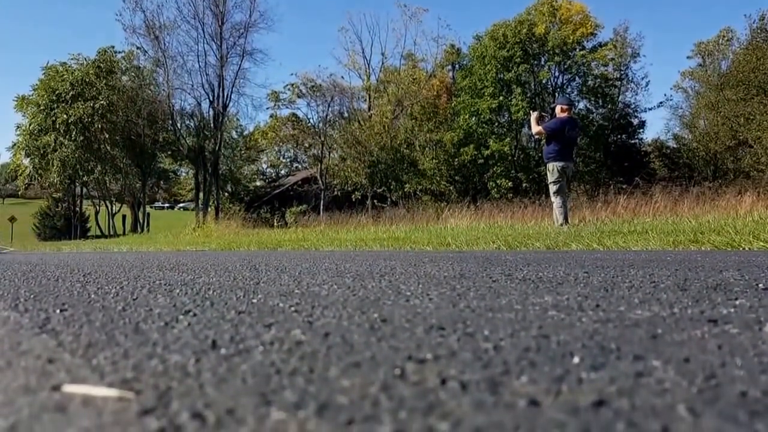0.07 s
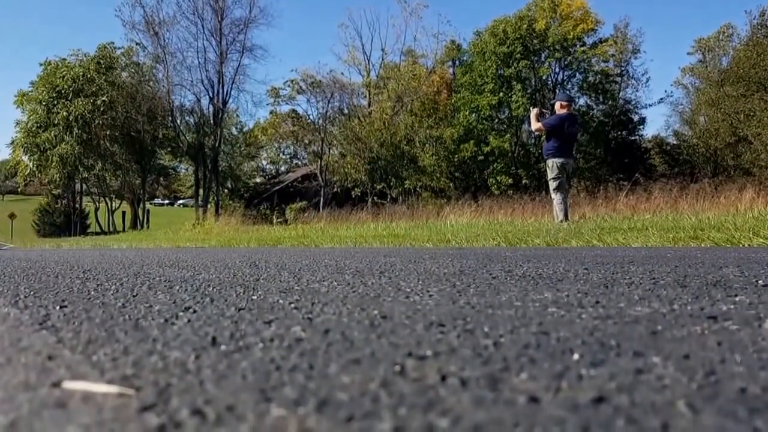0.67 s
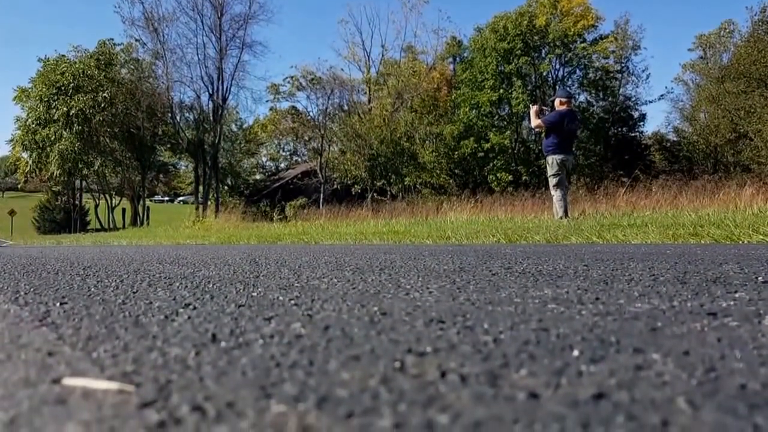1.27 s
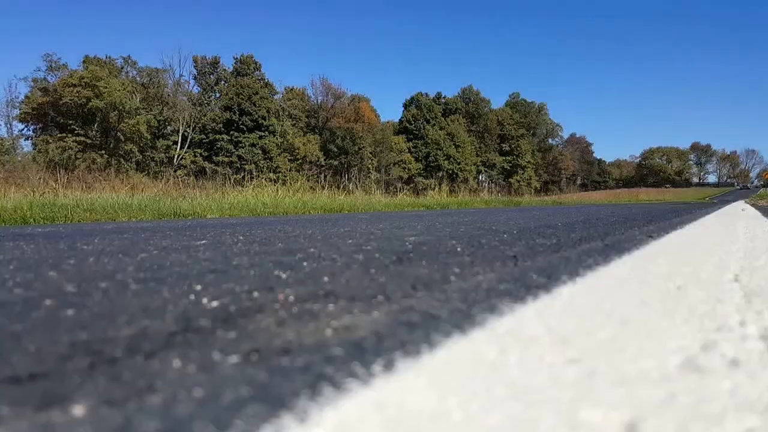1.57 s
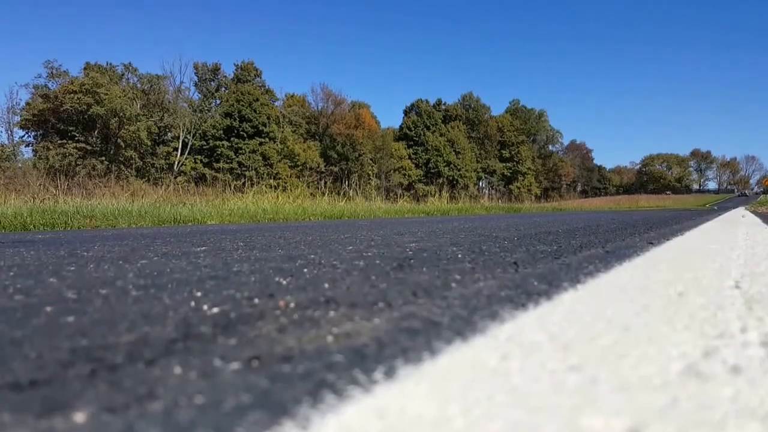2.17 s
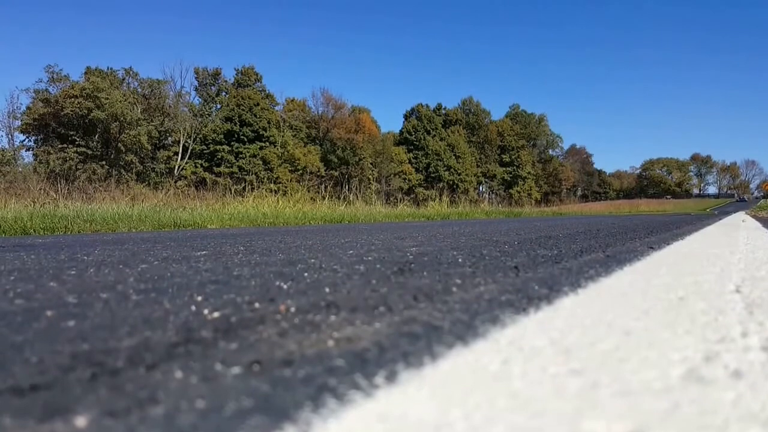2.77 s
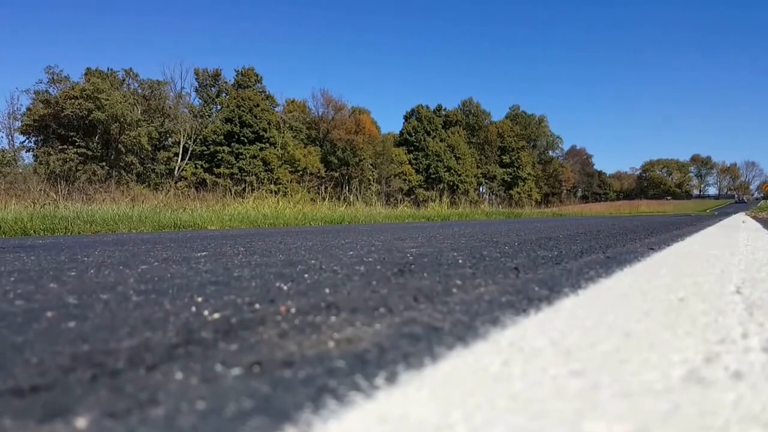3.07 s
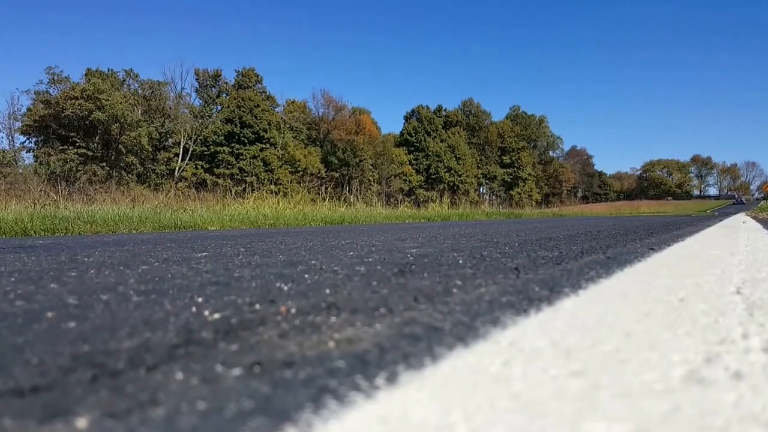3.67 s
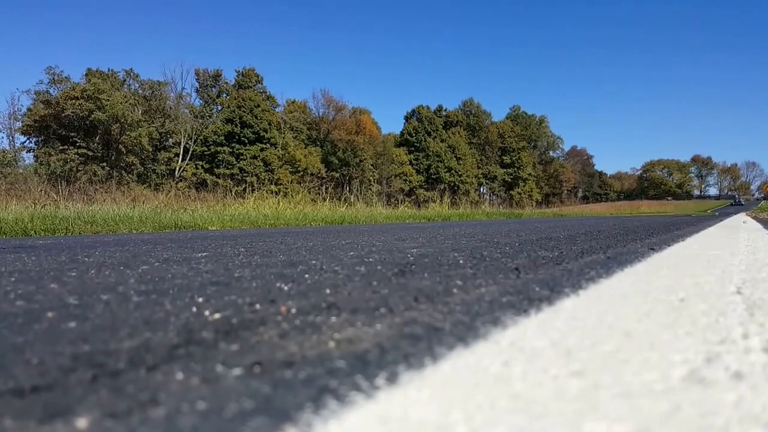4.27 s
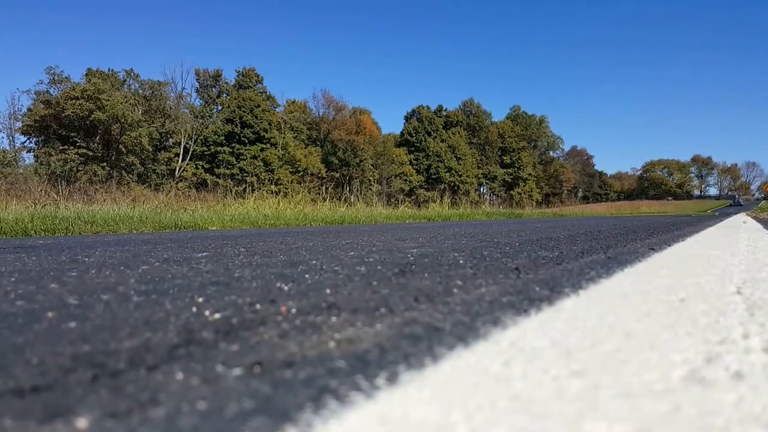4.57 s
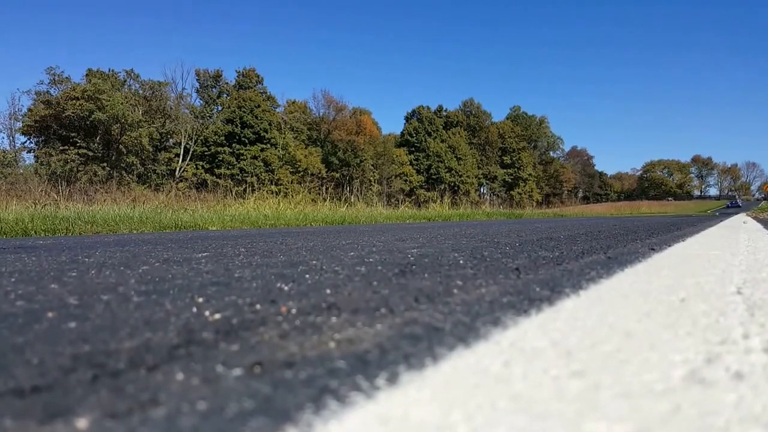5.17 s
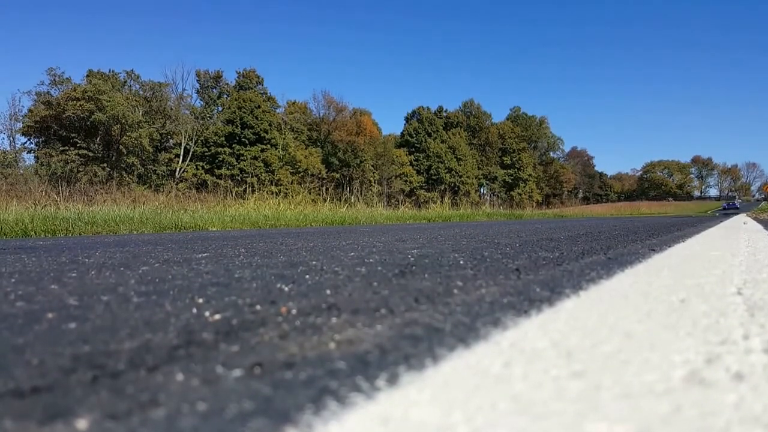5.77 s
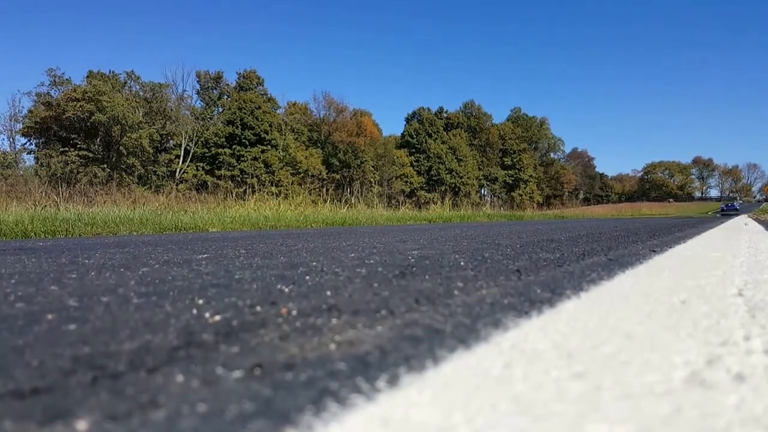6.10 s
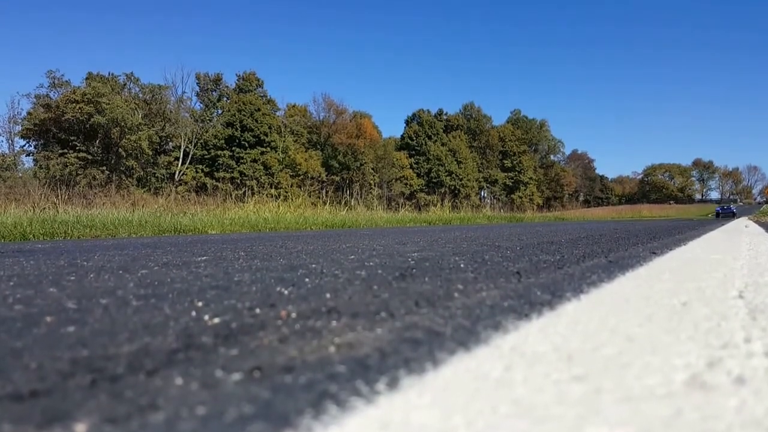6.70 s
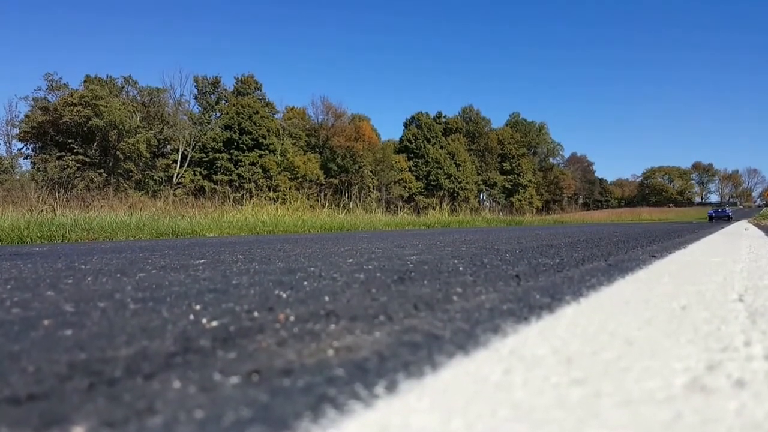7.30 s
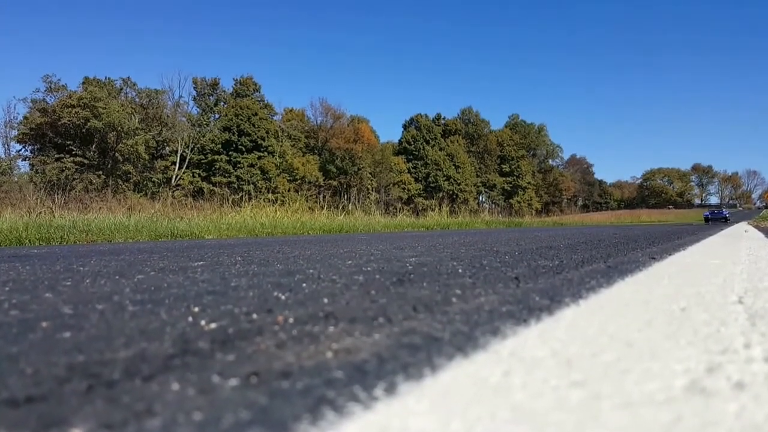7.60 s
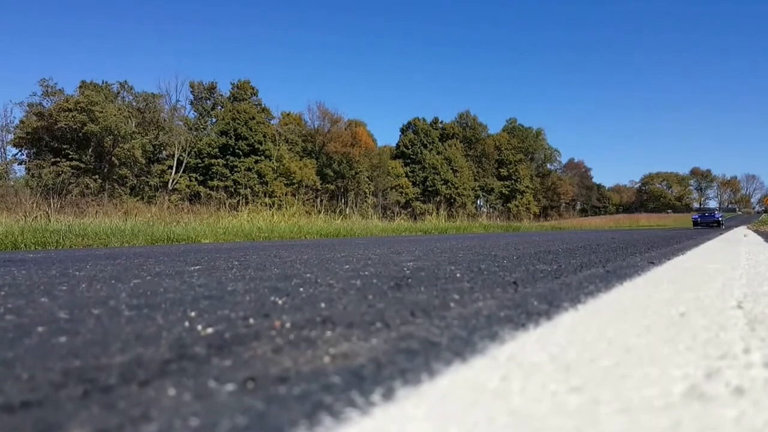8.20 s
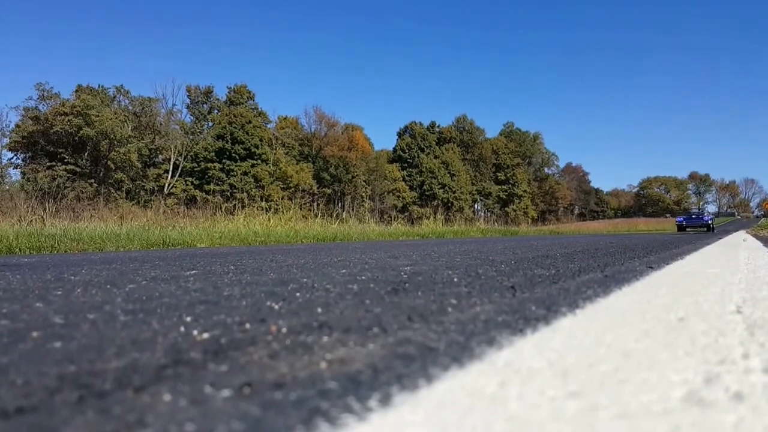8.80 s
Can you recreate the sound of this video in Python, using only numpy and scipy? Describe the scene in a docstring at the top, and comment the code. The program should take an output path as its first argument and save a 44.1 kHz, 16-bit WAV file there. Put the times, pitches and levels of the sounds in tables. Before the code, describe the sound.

A V8 car roars past close on the left with hissing exhaust, lifts off the throttle and is cut off abruptly. After a short silence the car is far away and much quieter, pulling, then easing to a low lumpy burble while its tyre hiss slowly grows. Something briefly brushes and ticks near the microphone on the right. A faint breeze and very faint insects lie behind it, beside a country road.

```python
"""V8 car on a country road, heard from the asphalt in two scenes. First it roars past close on the left
and lifts off the throttle. After a short silence it is far off, pulling, then easing to a burble as it
rolls nearer on hissing tyres. Exhaust: engine-cycle harmonics plus noise pulsed by the firings.
Something brushes and ticks near the microphone; a breeze stirs and insects chirp in the verge."""
import sys
import numpy as np
from scipy import signal
from scipy.fft import rfft, irfft, next_fast_len
from scipy.io import wavfile
from scipy.ndimage import map_coordinates

SR = 44100
rng = np.random.default_rng(int(sys.argv[2]) if len(sys.argv) > 2 else 0)


def int16_out(signal):
    """Quantize to a 16-bit WAV file."""
    q = np.round(np.clip(np.atleast_2d(signal).T, -1, 1) * 32767)
    wavfile.write(sys.argv[1], SR, q.astype(np.int16))


N = 390285
T = np.arange(N) / SR
TOP_HZ = 15750

# four-stroke cycle rate: t/s, f/Hz
NEAR_CYCLE_HZ = [(0, 31.06), (.2, 31.16), (.6, 32.16), (.76, 30.96), (1.02, 30.07), (1.25, 27.19),
                 (1.4, 26.31)]
FAR_CYCLE_HZ = [(1.8, 18.34), (2.4, 18.71), (3.36, 20.34), (3.55, 16.79), (4.1, 16.63), (4.45, 15.46),
                (5.55, 15.06), (5.98, 13.71), (6.7, 13.4), (7.1, 13.46), (8.85, 13.07)]
# close exhaust: cycle order (rounded in use), level/dB on throttle, level/dB lifted
NEAR_ORDERS_DB = [(2, -29, -29.5), (3, -14.5, -19), (4, -11, -21.5), (5, -18, -8.5), (6.01, -7.5, -1),
                  (7, -19, -15.5), (8, 0, -14.5), (9, -14.5, -12.5), (10, -12.5, -24), (11, -12.5, -18),
                  (11.87, -8.5, -19.5), (13, -17, -20.5), (14.1, -10, -34), (15, -4.5, -9),
                  (16, -10.5, -29.5), (17.2, -11.5, -20.5), (18, -18, -25.5), (19, -23.5, -31),
                  (20, -34.5, -43), (21, -24.5, -21), (22, -31, -38.5), (23, -16.5, -31), (24, -22, -38.5),
                  (25, -28.5, -31.5), (26, -30, -26.5), (27, -24.5, -33.5), (28, -45.5, -24),
                  (29, -24, -24.5), (30, -56, -35)]
# distant exhaust: cycle order, then level/dB pulling, easing, cruising, idling
FAR_ORDERS_DB = [(3, -27.5, -19, -21.5, -30), (4, -25, -24.5, -30, -21), (5, -8.5, -2, -11.5, -12),
                 (6, -21, -32, -9.5, -6.5), (7, -15, -20.5, -17, -16.5), (8, 1.5, -2, -9.5, -15),
                 (9, -38.5, -11, -30, -34), (10, -5.5, 0.5, 0, -25), (11, -17.5, -2, 0, -4.5),
                 (12, -24.5, -4, -10.5, -1.5), (13, -18, -7.5, 5, -6.5), (14, -22.5, -12.5, -2.5, 1.5),
                 (15, -18, -21.5, -3, -5.5), (16, -17.5, -14, -2, -7), (17, -29, -18.5, -37, -29),
                 (18, -40, -19, -31, -15.5), (19, -45.5, -31.5, -8, -34), (20, -29.5, -37, -26, -17),
                 (21, -49.5, -39, -26, -15), (22, -48, -27.5, -42, -32), (23, -35, -38, -28.5, -15.5),
                 (24, -44, -31, -45, -18.5)]
# overrun surges in the close pipe: t/s, boost/dB, half length/s
OVERRUN_SURGES = [(1.032, 3, 0.014), (1.154, 3, 0.014), (1.341, 5, .07)]
# distant exhaust envelope: t/s, level/dB
FAR_ENVELOPE_DB = [(2.05, -28.5), (3.3, -30), (4.2, -33.5), (5.1, -34.5), (5.52, -30.5), (5.95, -37),
                   (6.7, -37), (7.6, -35), (8.4, -31.5)]
# upper edge of a hollow in the hiss: t/s, f/Hz
HOLLOW_EDGE_HZ = [(0, 1960), (.12, 2700), (.28, 2165), (.47, 2000), (.56, 1570), (.88, 1075), (.98, 1330),
                  (1.05, 2250), (1.18, 1960), (1.27, 1130)]
# microphone body shading the right port: f/Hz, left over right/dB
PORT_SHADE_DB = [(100, 0), (250, 1.6), (700, 2.8)]
# earlier arrival at the left port: f/Hz, lead/rad
PORT_LEAD_RAD = [(30, .2), (80, .45), (250, .85), (470, 1.4), (950, 1.9), (4000, 5)]
# stretches of road where the tread sings: t/s, half length/s, f/Hz, level/dB
TREAD_TONES = [(4.002, 0.23, 1350, -64), (4.4, .7, 860, -61.5), (7.4, 0.46, 943, -58),
               (7.967, 0.076, 960, -50.5)]
# noise spectra: f/Hz, relative density/dB
NEAR_PIPE_DB = [(35, -43.5), (70, -13), (120, -9.5), (170, 0), (240, -7), (330, -18.5), (430, -4.5),
                (560, -9.5), (650, -21.5), (900, -13), (1200, -57.5), (3000, -75.5)]
GAS_JET_DB = [(900, -11), (1200, 6), (1600, 3.5), (2800, 0.5), (3650, 1.5), (4000, -8), (5300, -4.5),
              (6500, -8.5), (10200, -13), (11300, -29), (13000, -59)]
NEAR_TYRES_DB = [(300, -21.5), (700, -6), (1000, 3), (1300, 6), (1700, -1.5), (2300, -17), (4000, -24.5),
                 (7000, -44), (12000, -54.5)]
FAR_PIPE_DB = [(25, -37), (50, -28), (78, -6), (115, -11), (175, 1), (230, -8.5), (310, -17), (380, -20),
               (470, -28.5), (650, -40), (1500, -66)]
FAR_TYRES_DB = [(150, 0.5), (440, 4), (660, 1), (950, -2), (1200, -5), (1450, -7.5), (1900, -10.5),
                (2800, -18.5), (5000, -39.5), (10000, -66)]
TREAD_RING_DB = [(600, -34.5), (820, -1), (950, 0.5), (1080, -10), (1200, -16), (1600, -51)]
SCRAPE_DB = [(400, -27), (800, -8), (1650, 1.5), (2700, -3), (3800, -10.5), (5400, -6.5), (7000, -18.5),
             (9000, -16.5), (15000, -19)]
SIZZLE_DB = [(4000, -27), (7400, -9), (8600, 1.5), (10100, -15), (11500, 0.5), (14000, 1), (15500, -2.5)]
BREEZE_DB = [(590, -16.5), (1000, -3), (1680, -4), (1820, -8.5), (2680, -7), (3260, -13.5), (5150, -17),
             (6190, -23.5), (7700, -22.5), (9360, -23), (10500, -25.5), (15000, -19.5), (15500, -20.5)]
# diffuse sound: f/Hz, left-right correlation
COHERENCE = [(60, 0.94), (180, 0.61), (550, 0.93), (1650, -0.15), (4970, 0.07), (15000, -0.17)]
# dry ticks: t/s, peak before panning/dB, nominal band top/Hz, left over right/dB
TICK_EVENTS = [(2.233, -32, 4000, 8), (2.473, -29.5, 3500, -7), (2.575, -31.5, 6000, -9),
               (2.783, -31, 3500, -9), (2.8, -29, 5000, -11), (2.803, -30, 1500, -7),
               (3.043, -49, 13000, -11), (3.083, -42, 3000, -12), (3.641, -44, 4000, -4),
               (4.53, -46, 3000, -4), (5.074, -52, 891, 0), (5.648, -32.5, 2600, -1),
               (5.785, -41, 2600, -5), (6.717, -40.5, 11600, -6), (7.959, -44, 990, 0)]
# first insect: start/s, end/s, period/s, level/dB
CHIRP_BOUTS = [(.87, 1.3, 0.28, -72.5), (2.054, 3.2, 0.26, -75.5), (3.306, 6.3, .2605, -75.5),
               (6.548, 8.8, 0.25, -76.5)]
# second insect: start/s, end/s, level/dB
TRILL_BOUTS = [(4.118, 4.72, -80), (7.45, 7.68, -83)]


def near_car(pass_s=.35, pass_width_s=.29, lift_s=.75, lift_width_s=.051):
    """The pipe roars under load and burbles off throttle; gas hiss and tyres swell with the pass."""
    angle = crank_rad(NEAR_CYCLE_HZ, beat_s=.016)
    lift = .5 + .5 * np.tanh((T - lift_s) / (2 * lift_width_s))
    closeness = 1 / np.hypot(1, (T - pass_s) / pass_width_s)
    pipe_db = -15 - 8.5 * lift + sum(db * swell(s, half_s) for s, db, half_s in OVERRUN_SURGES)
    tone = exhaust(angle, NEAR_ORDERS_DB, lift, spread_rad=np.pi / 8, smear_rad=.8,
                   flutter_db=.8 + lift, stumble_rad=.1 + .4 * lift)
    burble = amp(-15 + 10 * lift) * noise(NEAR_PIPE_DB) * firing(angle, depth=.16)
    pipe = amp(pipe_db) * (tone + burble) / np.hypot(1, lift / 2)
    tyres = amp(-32.5) * closeness * (noise(NEAR_TYRES_DB) + amp(-4.5) * wide(NEAR_TYRES_DB))
    direct = filtered(pipe + hollowed(tyres, depth_db=13.5, lower_hz=1040, rim_db=4.5), near_ports)
    hiss = closeness * gas_jet(angle, lift)
    tree_scatter = amp(pipe_db - 20) * wide(NEAR_PIPE_DB)
    return direct + tree_scatter + hollowed(hiss, depth_db=15, lower_hz=950, rim_db=-1)


def far_car(arrival_s=9.68, right_lead_s=9e-5):
    """Falling revs turn the drone into a lumpy idle; road noise grows as the car nears."""
    angle = crank_rad(FAR_CYCLE_HZ, beat_s=1.807)
    cycle_hz = curve(FAR_CYCLE_HZ)
    state = np.interp(cycle_hz, [13.7, 15.1, 16.6, 18.6], [3, 2, 1, 0])  # 3 idling, 0 pulling
    smear_rad = np.interp(state, [0, 1, 2, 3], [2.4, 1.4, 1.3, 1.7])  # clearest thump at cruise
    tone = amp(.17 * state * wobble(14)) * exhaust(
        angle, FAR_ORDERS_DB, state, spread_rad=0, smear_rad=smear_rad,
        flutter_db=.23, stumble_rad=.051 * state)
    burble = amp(-15 + 2.8 * state) * noise(FAR_PIPE_DB) * firing(angle, depth=.32)
    tree_scatter = amp(-19) * wide(FAR_PIPE_DB)
    pipe = amp(curve(FAR_ENVELOPE_DB)) * (tone + burble + tree_scatter)
    closeness = 1 / np.maximum(arrival_s - T, .5)
    car = pipe + road_noise(closeness, cycle_hz) + whine_and_hum(closeness)
    delay_s = right_lead_s * np.array([[.5], [-.5]])
    return filtered(car, lambda hz: np.exp(-2j * np.pi * hz * delay_s)) * pan(-.7)


def crank_rad(speed, beat_s):
    """Engine-cycle angle: two shaft turns and eight firings per 2 pi, zero at the strong beat."""
    cycles = np.cumsum(curve(speed)) / SR
    return 2 * np.pi * (cycles - np.interp(beat_s, T, cycles))


def exhaust(angle, orders, state, spread_rad, smear_rad, flutter_db, stumble_rad):
    """Cycle harmonics. Spread: pipe dispersion; smear: blurred thump; stumble: uneven firing."""
    tone, power = 0, 0
    for order, *levels_db in orders:
        gain = amp(np.interp(state, np.arange(len(levels_db)), levels_db))
        phase = smear_rad * (rng.uniform(-1, 1) + .3 * wobble(2))
        phase += stumble_rad * order / 10 * wobble(22)
        phase -= spread_rad * round(order) ** 2
        tone += gain * amp(flutter_db * wobble(9.8)) * np.cos(round(order) * angle + phase)
        power += gain ** 2 / 2
    return tone / np.sqrt(power)


def firing(angle, depth):
    """Gas puffs: four a cycle from the nearer bank, one stronger."""
    return unit(np.exp(depth * (np.cos(angle) + np.cos(4 * angle))))


def gas_jet(angle, lift):
    """Pulsed exhaust hiss: bright under load, quieter and dull off throttle."""
    bright = wide(GAS_JET_DB) * firing(angle, depth=.087)
    dull = filtered(bright, lambda hz: amp(10) / np.hypot(1, hz / 2000))
    return amp(-36.5 - 19.5 * lift) * ((1 - lift) * bright + lift * dull) * pan(29.2)


def hollowed(x, depth_db, lower_hz, rim_db, rim_hz=150):
    """Phasing sound: a sunken band with a rim just above its sweeping upper edge."""
    hz, s, spectra = signal.stft(x, SR, nperseg=512)
    hz = hz[:, None]
    edge_hz = np.interp(s, *np.transpose(HOLLOW_EDGE_HZ))
    inside = np.clip((hz - lower_hz) / 150 + .5, 0, 1) * np.clip((edge_hz - hz) / 200 + .5, 0, 1)
    rim = np.exp(-((hz - edge_hz) / rim_hz - 1) ** 2)
    return signal.istft(spectra * amp(rim_db * rim - depth_db * inside), SR, nperseg=512)[1][..., :N]


def near_ports(hz):
    """Response to the close car: left port earlier, right port shaded."""
    sides = np.array([[.5], [-.5]])
    return amp(sides * along(PORT_SHADE_DB, hz)) * np.exp(1j * sides * along(PORT_LEAD_RAD, hz))


def road_noise(closeness, cycle_hz, rush_db_per_hz=4, murmur_db=-60):
    """Distant tyre roar, road murmur and rev-dependent gas rush; the tread rings in narrow bands."""
    rush = amp(-57 - rush_db_per_hz * (cycle_hz.max() - cycle_hz))
    level = np.sqrt((amp(-46) * closeness) ** 2 + amp(murmur_db) ** 2 + rush ** 2)
    roar = level * amp(.67 * wobble(8)) * wide(FAR_TYRES_DB)
    tread = amp(-51 + 2 * wobble(12)) * closeness ** 1.39 * wide(TREAD_RING_DB)
    songs = sum(amp(db) * swell(s, half_s) * narrow(hz, width_hz=62) for s, half_s, hz, db in TREAD_TONES)
    return roar + tread + songs


def whine_and_hum(closeness, whine_hz=525.5, hum_hz=444):
    """A thin whine growing with the approach; a narrow hum independent of revs."""
    level = amp(-54 + 2.9 * wobble(5)) * closeness
    whine = level * np.sin(2 * np.pi * whine_hz * T + .8 * wobble(4.8))
    return whine + amp(-61) * narrow(hum_hz, width_hz=24)[0]


def brushing():
    """Grainy hand stroke at the right, brightening, pressed hardest midway."""
    grain = amp(.61 * wobble(45) + 1.3 * wobble(250))
    scrape = amp(-53) * stroke(full_s=2.415) * wide(SCRAPE_DB) * pan(-7.5)
    sizzle = amp(-56) * stroke(full_s=2.59) * wide(SIZZLE_DB) * pan(-11)
    press_db = 4 * swell(at_s=2.64, half_s=.085)
    return grain * amp(press_db) * (scrape + sizzle)


def stroke(full_s, end_s=2.82, rise_db_per_s=126, fall_db_per_s=300):
    """Brushing envelope: rise, hold, quick release."""
    return amp(-rise_db_per_s * np.maximum(full_s - T, 0) - fall_db_per_s * np.maximum(T - end_s, 0))


def ticks(t60_s=.0057):
    """Dry ticks: fast-decaying bursts of band-passed noise."""
    out = np.zeros((2, N))
    t = np.arange(SR // 20) / SR
    for s, db, hz, left_db in TICK_EVENTS:
        band = signal.butter(1, [hz / 3, min(hz * .95, TOP_HZ)], "band", fs=SR)
        tick = signal.lfilter(*band, rng.standard_normal((2, len(t))) * amp(-60 * t / t60_s))
        out[:, round(s * SR):][:, :len(t)] += amp(db) * pan(left_db) * tick / np.abs(tick).max()
    return out


def breeze():
    """Light air in grass and trees."""
    return amp(-61.5 + .74 * wobble(1.57)) * wide(BREEZE_DB) * pan(-1)


def insect_chirps(pitch_hz=9400, width_hz=220, stroke_hz=105, length_s=.089, scatter_db=2):
    """Wing strokes ring one narrow resonance; chirps repeat evenly in bouts."""
    song = np.zeros(N)
    t = np.arange(int(length_s * SR)) / SR
    chirp = unit(np.abs(np.sin(np.pi * t / length_s)) ** .5 * np.sin(np.pi * stroke_hz * t) ** 2)
    for start_s, end_s, period_s, db in CHIRP_BOUTS:
        for s in np.arange(start_s, min(end_s, T[-1] - length_s), period_s):
            song[round(s * SR):][:len(t)] += amp(db + scatter_db * rng.standard_normal()) * chirp
    far_chorus = amp(-82.5 + 3.5 * wobble(12))
    return (song + far_chorus) * narrow(pitch_hz, width_hz) * pan(2.3)


def insect_trills(pitch_hz=7250, width_hz=350, ramp_s=.034):
    """Faint raspy buzz from deeper in the grass."""
    level = sum(amp(db) * np.clip(np.minimum(T - start_s, end_s - T) / ramp_s, 0, 1)
                for start_s, end_s, db in TRILL_BOUTS)
    rasp = filtered(rng.standard_normal((2, N)), lambda hz: 1 / (1 + ((hz - pitch_hz) / width_hz) ** 4))
    return level * amp(2 * wobble(40)) * unit(rasp)


def amp(db):
    """dB to gain."""
    return 10 ** (np.asarray(db) / 20)


def unit(x):
    """Scale to rms 1."""
    return x / np.sqrt(np.mean(x ** 2) + 1e-20)


def pan(left_db):
    """Stereo gains from left over right."""
    return amp([[left_db / 2], [-left_db / 2]])


def along(points, hz):
    """Interpolate (f/Hz, value) on a log axis."""
    knots_hz, values = np.transpose(points)
    return np.interp(np.log(hz + 1), np.log(knots_hz + 1), values)


def curve(points):
    """Interpolate (t/s, value) per sample."""
    return np.interp(T, *np.transpose(points))


def swell(at_s, half_s):
    """Bell curve, height 1."""
    return np.exp(-((T - at_s) / half_s) ** 2)


def wobble(knots_per_s):
    """Smooth random curve."""
    coarse_s = T[::64]
    spline = map_coordinates(rng.standard_normal(1024), [coarse_s * knots_per_s], mode="wrap")
    return np.interp(T, coarse_s, spline)


def filtered(x, response):
    """Apply response(hz) by FFT."""
    size = next_fast_len(N + SR // 2)
    return irfft(rfft(x, size) * response(np.fft.rfftfreq(size, 1 / SR)), size)[..., :N]


def noise(spectrum):
    """Coloured mono noise, rms 1."""
    return unit(filtered(rng.standard_normal(N), lambda hz: amp(along(spectrum, hz))))


def wide(spectrum):
    """Coloured stereo noise, rms 1: alike in the bass, nearly unrelated in the treble."""
    def mid_side(hz):
        turn_rad = np.arccos(np.clip(along(COHERENCE, hz), -1, 1)) / 2
        return amp(along(spectrum, hz)) * [np.cos(turn_rad), np.sin(turn_rad)]
    mid, side = filtered(rng.standard_normal((2, N)), mid_side)
    return unit(np.array([mid + side, mid - side]))


def narrow(pitch_hz, width_hz):
    """Stereo noise in one resonance, rms 1."""
    white = rng.standard_normal((2, N))
    return unit(filtered(white, lambda hz: 1 / (1 + ((hz - pitch_hz) / width_hz) ** 2)))


def scene(stop_s=1.401, resume_s=1.82):
    """The close pass stops dead; after a silence the distant approach fades in."""
    near_gate = np.clip((stop_s - T) / .002, 0, 1) * np.clip(T / .003, 0, 1)
    far_gate = np.clip((T - resume_s) / .29, 0, 1) ** .91
    chirps = insect_chirps()
    near = near_car() + chirps
    far = far_car() + breeze() + chirps + insect_trills() + brushing() + ticks()
    return near_gate * near + far_gate * far


def record(dry):
    """Steep low-pass at TOP_HZ."""
    return filtered(dry, lambda hz: 1 / (1 + (hz / TOP_HZ) ** 200))


dry = scene()
out = record(dry)
int16_out(out)
```